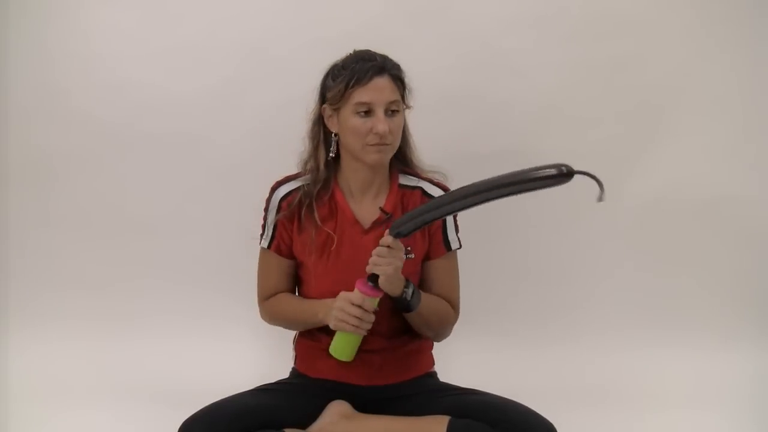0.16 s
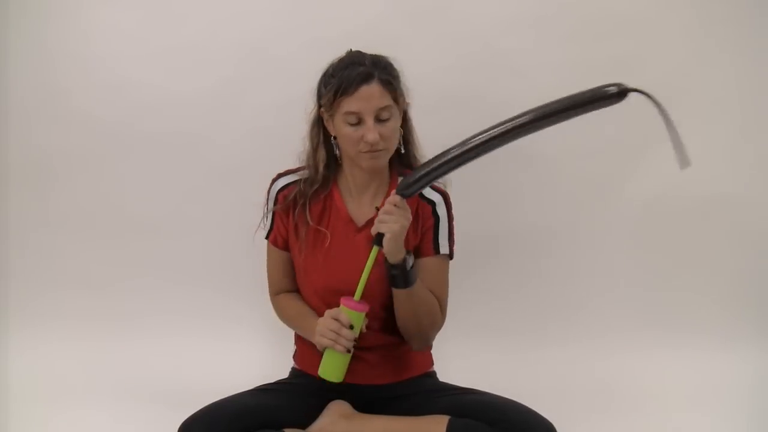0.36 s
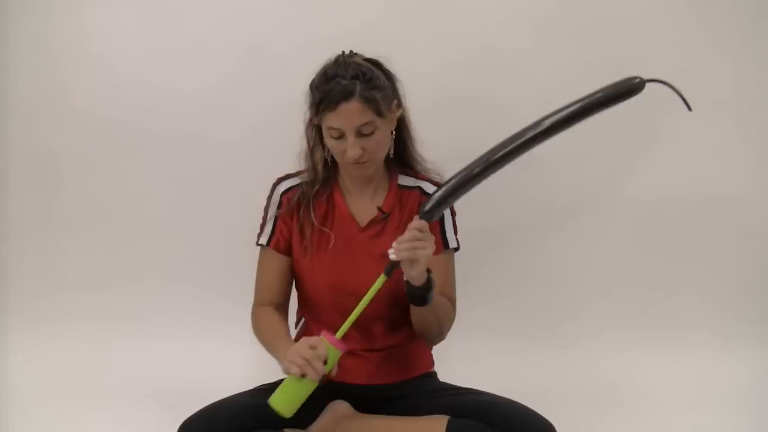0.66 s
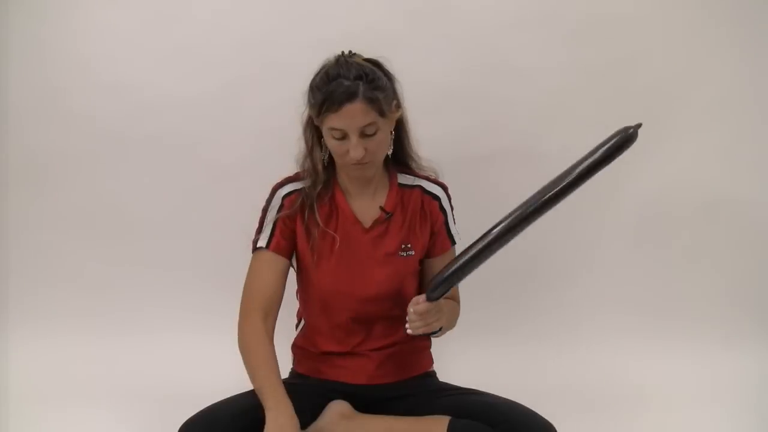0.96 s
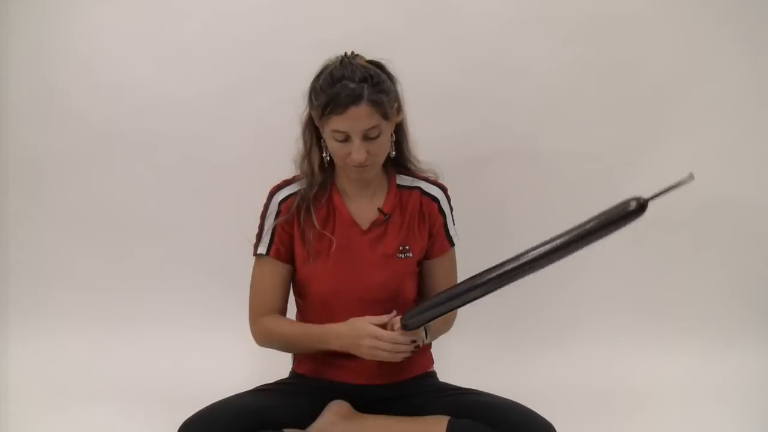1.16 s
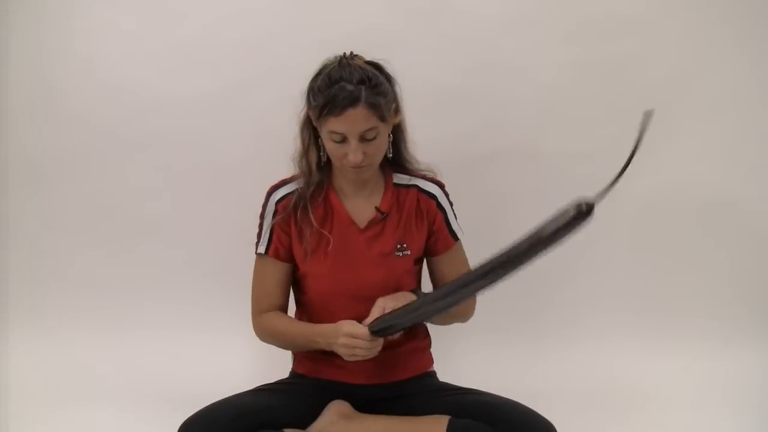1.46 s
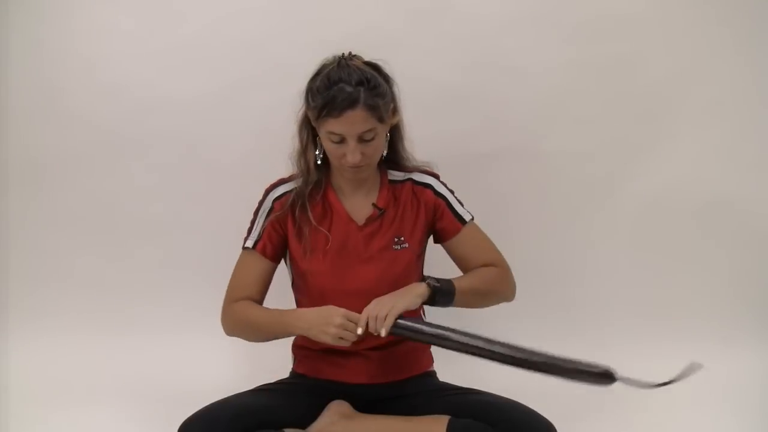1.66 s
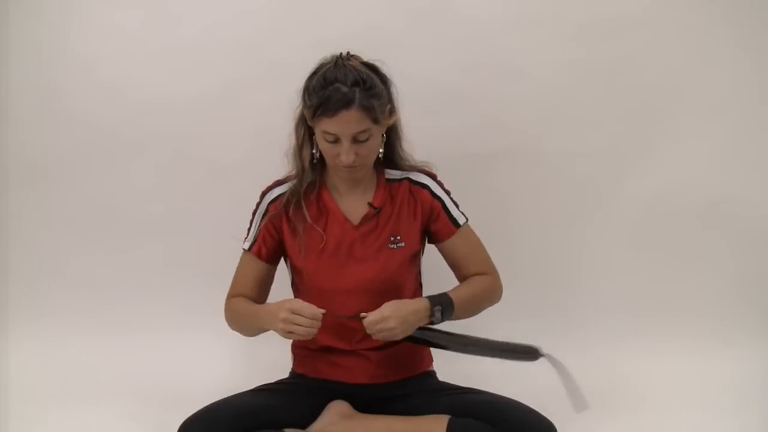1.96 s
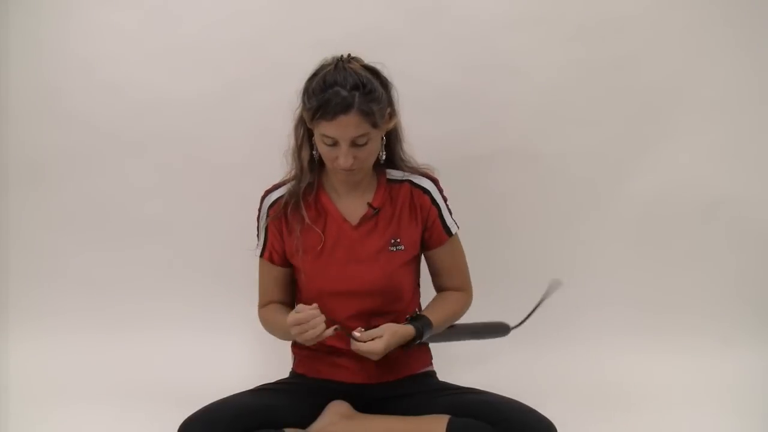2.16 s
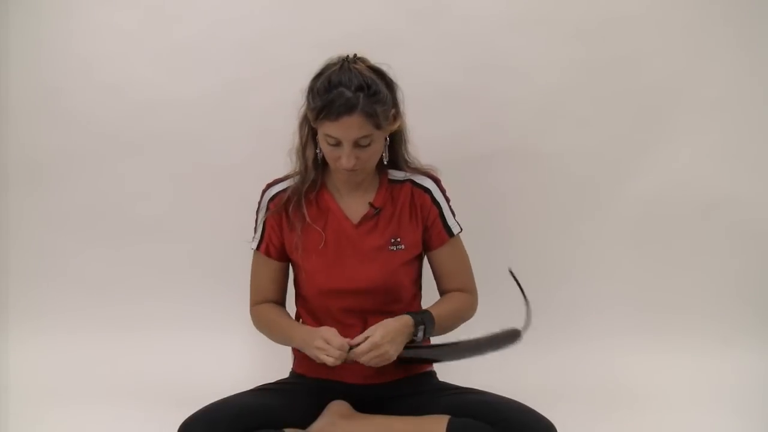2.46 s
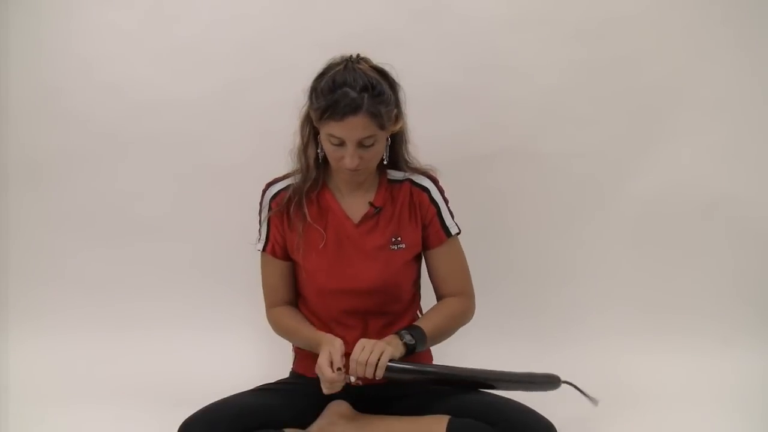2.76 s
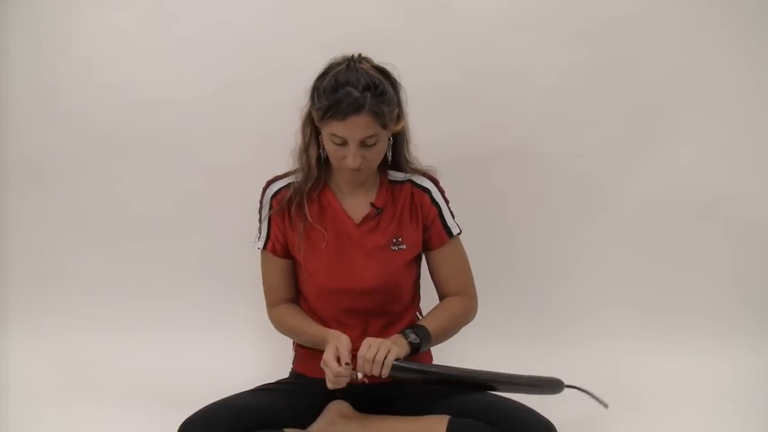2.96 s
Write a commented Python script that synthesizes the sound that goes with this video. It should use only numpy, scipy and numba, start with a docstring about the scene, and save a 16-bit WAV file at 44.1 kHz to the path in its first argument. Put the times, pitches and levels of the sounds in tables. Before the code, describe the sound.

Latex balloon squeaks, snaps and crackles under fingers after last hand-pump hisses in a quiet room

```python
"""A quiet room, with a long latex balloon close to the microphone. A hand pump hisses its last strokes into it:
shaped noise follows the air flow and stirs the tones of the air column. The piston knocks as sagging sines.
Then fingers rub, stretch and knot the neck: rustle of grainy noise bands, hollow thumps, squeaky ticks,
and creaks, crackle and snaps made of brief paired rings. A short echo and a faint room tone surround it."""
import sys
import numpy as np
from scipy import signal
from scipy.fft import rfft, irfft
from scipy.io import wavfile
from scipy.ndimage import uniform_filter1d
from numba import njit

SR = 44100
rng = np.random.default_rng(int(sys.argv[2]) if len(sys.argv) > 2 else 0)


def materialize(psi):
    """Save the field psi as 16-bit PCM at rate SR to the path in sys.argv[1].

    A 1-D psi becomes a single channel; in a 2-D psi each row is a channel.
    """
    bounded = np.clip(np.atleast_2d(psi).T, -1, 1)
    quanta = np.round(bounded * 32767).astype(np.int16)
    wavfile.write(sys.argv[1], SR, quanta)


N = 136710
T = np.arange(N) / SR  # s


def undb(db):
    """Amplitude ratio of a level in dB."""
    return 10 ** (np.asarray(db) / 20)


def unit(x):
    """Scale to an rms of 1."""
    return x / np.sqrt(np.mean(x ** 2))


def noise(count=N):
    """White noise."""
    return rng.standard_normal(count)


def decay(t, t60):
    """Exponential decay that loses 60 dB in t60 seconds."""
    return undb(-60 * t / t60)


def band(x, lo_hz, hi_hz):
    """Keep one frequency band."""
    edges = [lo_hz, min(hi_hz, .45 * SR)]
    return signal.sosfilt(signal.butter(2, edges, "bandpass", fs=SR, output="sos"), x)


def coloured(shape):
    """Noise of rms 1 whose spectrum follows (f/Hz, level/dB) points, joined over log frequency."""
    f, db = np.array(shape).T
    hz = np.maximum(np.arange(N // 2 + 1) * SR / N, 1)
    gain = undb(np.interp(np.log(hz), np.log(f), db))
    return unit(irfft(rfft(noise()) * gain, N))


def add(out, s, x):
    """Mix an event in at s seconds."""
    i = int(s * SR)
    out[i:i + len(x)] += x[:N - i]


def room_tone():
    """Steady background noise, strongest in the bass."""
    # spectrum of the quiet room: f/Hz, relative density/dB per Hz
    room_shape = [(30, 2.5), (215, -8), (3220, -25), (7870, -28.5), (16000, -39.5)]
    return undb(-50.5) * coloured(room_shape)


def echo(near):
    """The room's reflections: a decaying noise tail that starts 4 ms after the direct sound."""
    level_db, t60_s = -15.5, 0.12
    t = T[:SR // 2]
    tail = noise(len(t)) * decay(t, t60_s) * (t > .004)
    tail = tail / np.sqrt(np.sum(tail ** 2))
    return undb(level_db) * signal.fftconvolve(near, tail)[:N]


def air_flow():
    """Each pump stroke swells, holds and stops dead but for a short after-hiss."""
    # pump strokes: start/s, full flow/s, stop/s, hiss level/dB
    stroke_table = [(-.02, 0.005, 0.11, -16.5), (0.216, 0.219, 0.26, -24), (0.324, 0.426, 0.52, -16.5)]
    # air still settling through the valve once a stroke stops
    after_db, after_t60_s = -15.5, 0.33
    flow = np.zeros(N)
    for start, full, stop, db in stroke_table:
        swell = np.clip((T - start) / (full - start), 0, 1)
        after = undb(after_db) * decay(np.maximum(T - stop, 0), after_t60_s)
        flow += undb(db) * np.where(T < stop, swell, after)
    return flow


@njit
def ring(x, turn, keep):
    """One resonance, driven by x, whose pitch may move (turn in radians per sample)."""
    y, z = np.empty(len(x)), 0j
    for i in range(len(x)):
        z = z * keep * np.exp(1j * turn[i]) + x[i]
        y[i] = z.imag
    return y


def mode(x, hz, t60):
    """Ring one resonance at a moving pitch in Hz, with its decay time in s."""
    turn = 2 * np.pi * hz * np.ones(N) / SR
    return ring(x, turn, np.exp(-np.log(1000) / (t60 * SR)))


def pump():
    """Nozzle hiss follows the flow; the balloon's air column sings on and sags in pitch as it dies."""
    # spectrum of the nozzle hiss: f/Hz, relative density/dB per Hz
    nozzle_shape = [(880, -33.5), (1500, -11), (6060, -17), (10600, -13.5), (16000, -20)]
    # tones of the air column: f/Hz at full flow, level/dB re hiss, t60/s of the fade after the inflow
    tube_tones = [(1404, -9, 0.28), (2683, -15.5, 0.3)]
    sag_share = 0.061  # fall in tube pitch when no air flows
    tone_t60_s = 0.066  # short enough for the tones to waver
    low_hiss_db = -9.5  # re nozzle hiss

    flow = air_flow()
    low_hiss = undb(low_hiss_db) * unit(band(noise(), 490, 1660))
    out = flow * (coloured(nozzle_shape) + low_hiss)
    mean_flow = uniform_filter1d(flow, size=9000) / flow.max()  # over about 0.2 s
    pitch = 1 - sag_share * (1 - np.clip(mean_flow, 0, 1))
    for hz, tone_db, fade_t60 in tube_tones:
        keep = undb(-60 / (fade_t60 * SR))
        drive = flow ** 2 / flow.max()
        stir = signal.lfilter([1 - keep], [1, -keep], drive, zi=[flow[0]])[0]
        out += undb(tone_db) * stir * unit(mode(noise(), hz * pitch, tone_t60_s))
    return out


def thumps():
    """Each knock is a few sagging cycles at its own pitch; the skin shudders on in broad, rough bands."""
    # knocks of the piston, then of hands on the taut skin:
    # t/s, level/dB, f/Hz, t60/s (at least 0.01 is used), shudder of the skin/dB re knock
    knock_table = [(0.112, -5, 267, 0.044, -2.5), (0.2245, -0.5, 413, 0.015, -7),
                   (0.238, -13.5, 506, 0.088, -7), (0.316, -4.5, 500, 0.0088, -16.5),
                   (0.535, -16.5, 126.5, 0.16, 5), (0.733, -25, 570, 0.026, -2),
                   (1.542, -14, 171, 0.031, -4), (1.728, -21.5, 341, 0.063, -4.5),
                   (2.125, -12.5, 343, 0.032, -1), (2.163, -18.5, 227, 0.098, -1.5),
                   (2.2479, -8.5, 716, 0.016, -8.5), (2.345, -12.5, 572, 0.033, -7.5),
                   (2.361, -14.5, 501, 0.044, -11), (2.8, -9, 254.5, 0.068, -0.5)]
    # bands of the shuddering skin: f/Hz, level/dB re shudder, t60/s
    skin_bands = [(132.6, -17.5, 0.18), (228.3, -16.5, 0.19), (360, -19.5, 0.15), (599, -14.5, 0.15)]
    glide = 0.35  # whole fall in pitch as a share of f: half above it, half below
    out, t = np.zeros(N), T[:SR // 5]
    for s, db, hz, t60, skin_db in knock_table:
        fade = decay(t, max(t60, .01))
        pitch = hz * (1 + glide * (fade - .5))
        knock = np.sin(2 * np.pi * np.cumsum(pitch) / SR) * fade
        for f, band_db, skin_t60 in skin_bands:
            shudder = unit(band(noise(len(t)), f / 1.198, f * 1.166))
            knock = knock + undb(skin_db + band_db) * decay(t, skin_t60) * shudder
        onset = 1 - np.exp(-t * hz / 0.24)
        add(out, s, undb(db) * onset * knock)
    return out


def slip_gate():
    """Dense uneven slips of skin on latex: random impulses, each dying away, over a steady share."""
    slips_per_s, spread_db, slip_s, steady = 1500, 6, 0.002, 0.23
    happens = rng.random(N) < slips_per_s / SR
    slips = happens * undb(-spread_db * np.log(rng.random(N) + 0.068))
    return steady + unit(signal.lfilter([1], [1, -np.exp(-1 / (slip_s * SR))], slips))


def rub():
    """Each slide of a finger swells and dies; the same uneven slips ride on all its noise bands."""
    # slides of fingers on latex: start/s, peak/s, end/s, level/dB, voice f/Hz,
    # treble/dB re level, bass/dB re level
    slide_table = [(0.699, 0.712, 0.79, -47, 4600, 6.5, 2), (0.755, 0.793, .87, -30.5, 2670, 2.5, -12),
                   (1.025, 1.054, 1.125, -32.5, 1650, -5.5, 6.5), (1.11, 1.117, 1.22, -32, 1880, -0.5, 7.5),
                   (1.181, 1.181, 1.273, -44, 1610, -37, 15.5),
                   (1.329, 1.449, 1.51, -37.5, 2440, -21.5, 3.5), (1.463, 1.491, 1.502, -25.5, 3140, 10, 1),
                   (1.488, 1.518, 1.63, -35.5, 2010, -2, 2), (1.728, 1.728, 1.75, -25.5, 1820, -10, 2.5),
                   (1.731, 1.776, 1.9, -26.5, 2650, -12, -9.5),
                   (1.834, 1.88, 1.96, -22.5, 3130, -1.5, -2.5), (2.033, 2.11, 2.11, -38, 3040, 2, -3.5),
                   (2.105, 2.152, 2.246, -38, 2600, 4, 9.5), (2.2, 2.243, 2.324, -32, 2160, -4, 2),
                   (2.246, 2.343, 2.45, -24, 1970, -1, -4.5),
                   (2.384, 2.454, 2.69, -29.5, 2900, -3.5, -12.5),
                   (2.61, 2.741, 2.785, -37.5, 3200, 5.5, -7.5), (3.07, 3.115, 3.393, -29, 3060, 2, -8.5)]
    fade_db = -22.5  # level left at the end of a slide
    width, core_width = 1.94, 1.252  # ratio of band edges to the voice's centre: whole, narrow core
    gate = slip_gate()
    rustle = gate * noise()
    treble = unit(band(gate * noise(), 3640, 13040))
    bass = unit(band(gate * noise(), 188, 1180))
    out = np.zeros(N)
    for start, peak, end, db, hz, high_db, low_db in slide_table:
        part = (T > start) & (T < 2 * end - peak)  # the fade runs on past the end
        t, y = T[part], rustle[part]
        swell = np.clip((t - start) / (peak - start), 0, 1) ** 1.71
        spent = np.clip((t - peak) / (end - peak), 0, None)
        push = swell * undb(fade_db * spent ** 1.33)
        broad = unit(band(y, hz / width, hz * width))
        core = unit(band(y, hz / core_width, hz * core_width))
        voice = unit(broad + core) * np.std(y) / np.std(rustle)
        sound = voice + undb(high_db) * treble[part] + undb(low_db) * bass[part]
        out[part] += push * undb(db) * sound
    return out


def tick(db):
    """A short rough squeak: five harmonics of uneven strength."""
    f_hz, t60_s = 2760, 0.027
    t, k = T[:SR // 20], np.arange(1, 6)[:, None]
    harmonics = np.sin(2 * np.pi * (f_hz * k * t + rng.random(k.shape)))
    x = np.sum(rng.random(k.shape) * harmonics, axis=0)
    x = x * decay(t, t60_s) * (1 + .5 * noise(len(t)))
    return undb(db) * x / np.abs(x).max()


def fingertip_ticks():
    """Faint squeaky ticks of a fingertip."""
    # ticks: t/s, peak level/dB
    tick_table = [(2.902, -22), (2.92, -24.5), (2.999, -23), (3.009, -21.5)]
    out = np.zeros(N)
    for s, db in tick_table:
        add(out, s, tick(db))
    return out


def snap(db, hz, ring_t60_s=0.0063):
    """Latex springs free: two brief rings either side of the pitch, with a broad noise crack on top."""
    crack_t60_s, crack_db = 0.0043, 1
    t = T[:SR // 20]
    crack = undb(crack_db) * band(noise(len(t)), hz / 3.8, hz * 1.83) * decay(t, crack_t60_s)
    up, down = 0.096 * rng.random(2)  # random detuning, up to 9.6 %
    pair = np.sin(2 * np.pi * hz * (1 + up) * t) + np.sin(2 * np.pi * hz * (1 - down) * t)
    onset = 1 - np.exp(-t / 0.000093)
    x = onset * (pair / 2 * decay(t, ring_t60_s) + crack)
    return undb(db) * x / np.abs(x).max()


def creak():
    """Slips that come ever faster and harder as the neck is stretched."""
    span_s, rate_hz, level_db = (1.425, 1.486), (169, 345), (-29.5, -17.5)  # each from start to end
    out = np.zeros(N)
    s = span_s[0]
    while s < span_s[1]:
        db = np.interp(s, span_s, level_db) + 2 * rng.standard_normal()
        add(out, s, snap(db, 4000 * (.5 + rng.random())))
        s += (1 + 0.06 * rng.standard_normal()) / np.interp(s, span_s, rate_hz)
    return out


def neck_crackle():
    """The twisted neck crackles: each burst is a low and a high snap together."""
    # crackles: t/s, level/dB (before the trims of the two snaps)
    crackle_table = [(2.4283, -17), (2.4348, -8.5), (2.4518, -6.5), (2.4788, -12), (2.4862, -7.5),
                     (2.4922, -13.5), (2.5002, -23), (2.5146, -15), (2.518, -15), (2.5296, -13),
                     (2.5337, -15), (2.5395, -11.5), (2.544, -14), (2.5519, -9.5), (2.5652, -10.5),
                     (2.6593, -16.5), (2.7023, -9.5), (2.7132, -14.5), (2.7192, -12)]
    low_hz, high_hz, low_t60_s = 3170, 8170, 0.0095
    out = np.zeros(N)
    for s, db in crackle_table:
        add(out, s, snap(db - 2, low_hz, low_t60_s) + snap(db - 2.5, high_hz))
    return out


def snaps():
    """Latex snaps free of a finger, each time at its own ring pitch."""
    # snaps: t/s, peak level/dB, ring f/Hz
    snap_table = [(0.114, 0.5, 5290), (0.2774, -12.5, 1930), (0.6142, -11.5, 2000), (0.781, -20.5, 2570),
                  (1.052, -17.5, 1540), (1.09, -17, 1700), (1.1152, -20, 2300), (1.1398, -6, 1480),
                  (1.1938, -14.5, 1720), (1.277, -29.5, 3020), (1.5444, 1, 8120), (1.731, -9.5, 1820),
                  (1.8376, -14, 4540), (1.8924, -0.5, 3170), (2.154, -13.5, 2680)]
    out = np.zeros(N)
    for s, db, hz in snap_table:
        add(out, s, snap(db, hz))
    return out


def scene():
    """Pump, hands and latex close by, with their echo and the room tone."""
    hands = rub() + fingertip_ticks() + creak() + neck_crackle() + snaps()
    near = pump() + thumps() + hands
    return (near + echo(near) + room_tone())[None]


def record(dry):
    """The microphone drops the deep bass; the top is cut steeply above 16 kHz."""
    x = signal.sosfilt(signal.butter(3, 90, "highpass", fs=SR, output="sos"), dry)
    return signal.sosfilt(signal.ellip(8, .2, 70, 16000, fs=SR, output="sos"), x)


dry = scene()
out = record(dry)
materialize(out)
```